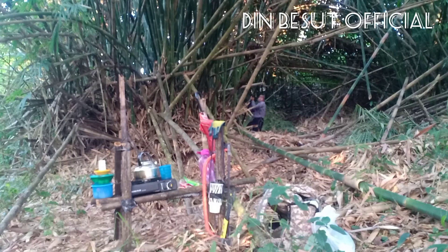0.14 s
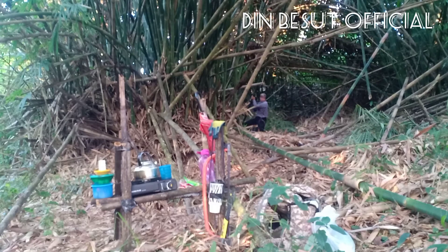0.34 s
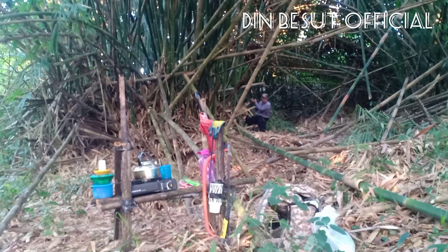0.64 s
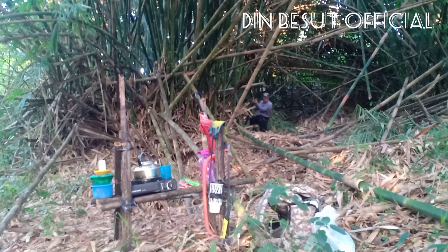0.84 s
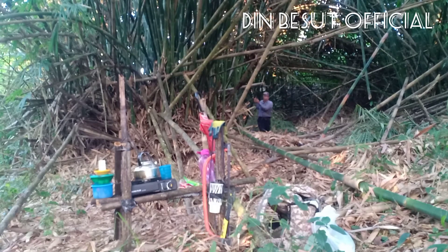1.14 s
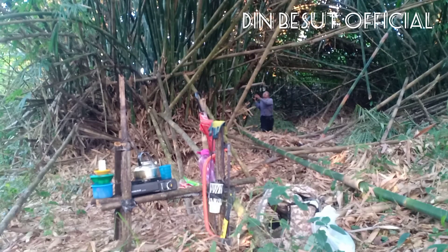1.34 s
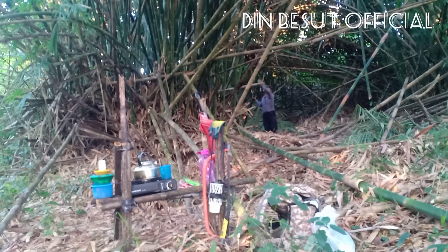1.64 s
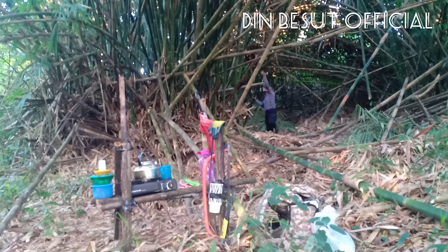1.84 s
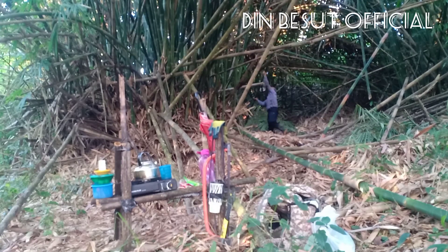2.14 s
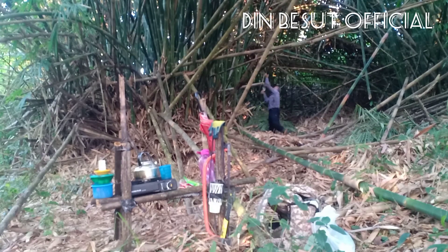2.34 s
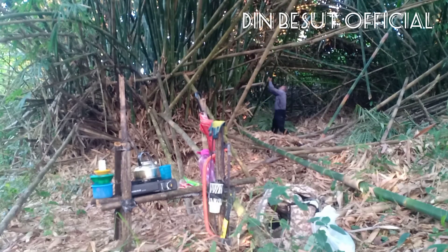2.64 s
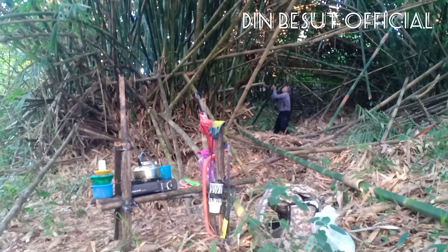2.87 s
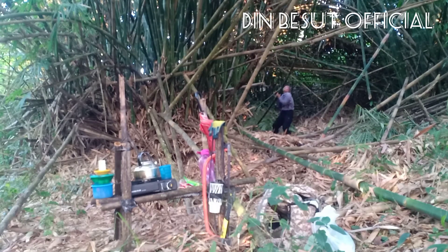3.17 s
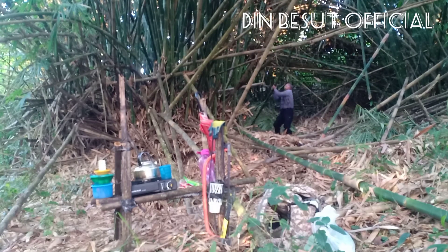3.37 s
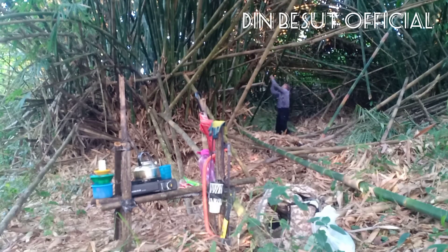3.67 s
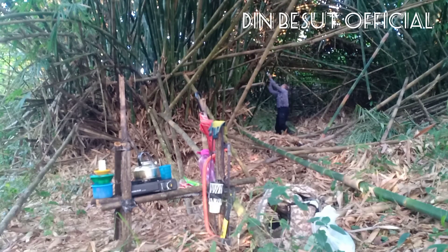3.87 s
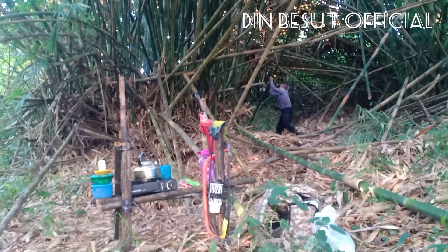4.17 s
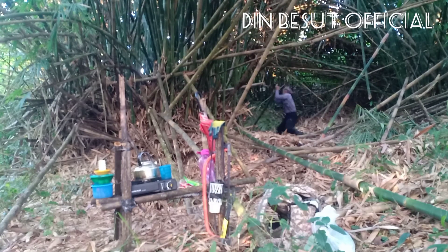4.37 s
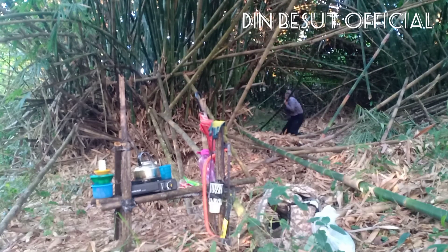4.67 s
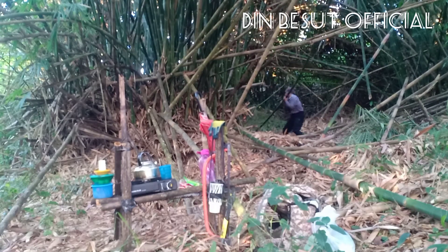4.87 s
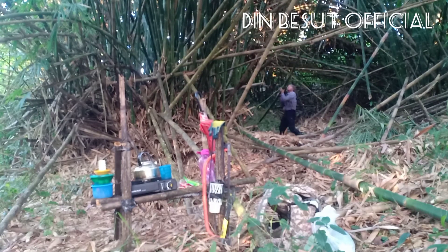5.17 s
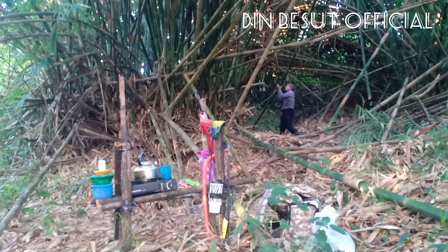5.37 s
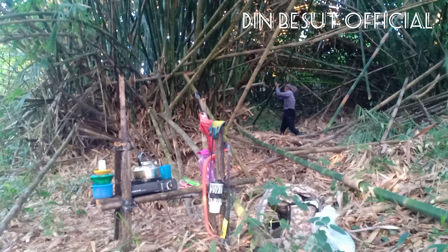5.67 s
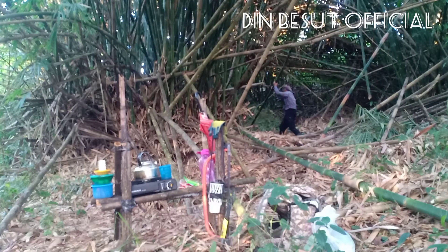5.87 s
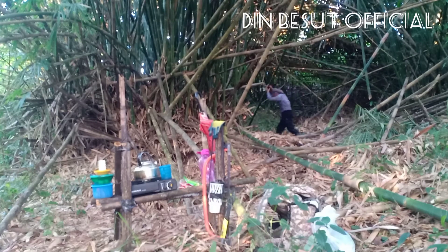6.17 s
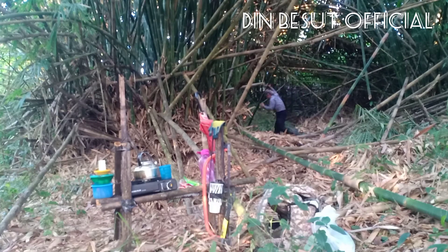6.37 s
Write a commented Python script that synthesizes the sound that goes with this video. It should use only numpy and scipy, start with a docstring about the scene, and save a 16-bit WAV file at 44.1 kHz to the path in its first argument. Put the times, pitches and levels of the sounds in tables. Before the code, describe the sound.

A bush knife chops hollow bamboo in a grove, with loud cracks, snapping twigs and shaking dry leaves over a thin high insect hiss.

```python
"""A dense bamboo grove: a bush knife chops some way off, twigs snap and dry leaves shake.
Cracks are damped swings, hollow stems ring in modes, and the stems scatter each crack into a short tail.
Leaves are dense ticks over noise; insects hiss in a narrow high band; far air is coloured noise.
Rubbing stems creak, short tones make faint squeaks and insect chirps, and a cut stem lands with a thud.
Two close microphone ports with a peaky treble hear it all."""
import sys
import numpy as np
from scipy import signal
from scipy.fft import rfft, irfft, next_fast_len
from scipy.io import wavfile
from scipy.ndimage import uniform_filter1d

SR = 44100
rng = np.random.default_rng(int(sys.argv[2]) if len(sys.argv) > 2 else 0)


def dump_mix(stems):
    """Bounce the given channels to the path in sys.argv[1] as a 16-bit WAV at rate SR."""
    frames = np.atleast_2d(stems).T  # one column per channel
    limited = np.clip(frames, -1, 1)  # hard clip at full scale
    pcm = np.round(limited * 32767).astype(np.int16)
    wavfile.write(sys.argv[1], SR, pcm)


N = 287213  # samples
SIZE = next_fast_len(N)
BINS_HZ = np.fft.rfftfreq(SIZE, 1 / SR)


def gain_of(db):
    """Decibels to amplitude gain."""
    return 10 ** (np.asarray(db) / 20)


def evened(x):
    """Scales to rms 1."""
    return x / np.sqrt(np.mean(x ** 2) + 1e-20)


def read(points, hz):
    """Reads a spectrum table on a log-frequency axis."""
    point_hz, value = np.transpose(points)
    return np.interp(np.log(hz + 1), np.log(point_hz + 1), value)


def follow(rows, t):
    """Reads every column of a curve at times t."""
    s, *columns = np.transpose(rows)
    return [np.interp(t, s, column) for column in columns]


def add(mix, start_s, sound):
    """Adds a sound in place, cut at the end of the mix."""
    part = mix[round(start_s * SR):][:len(sound)]
    part += sound[:len(part)]


def ports(left, right, lead_s):
    """Turns spectra into sound that reaches the left port lead_s before the right."""
    turn = np.exp(1j * np.pi * BINS_HZ * lead_s)  # half the lead on each side
    return irfft(np.array([left * turn, right / turn]), SIZE)[:, :N]


DIFFUSE_LEAD_S = 9e-5
# Likeness of the ports in diffuse sound. Each row: frequency in Hz, left-right correlation (0 to 1).
LIKENESS = [(30, .965), (80, .99), (170, .965), (350, .955), (600, 0.77), (1200, 0.67), (2500, 0.17),
            (5000, 0.14), (10000, 0.1)]


def diffuse(a, b):
    """Sound from all around: the two ports share the bass and differ in the treble."""
    same = np.clip(read(LIKENESS, BINS_HZ), 0, .992)
    a, b = rfft(a, SIZE), rfft(b, SIZE)
    return ports(a, same * a + np.sqrt(1 - same ** 2) * b, DIFFUSE_LEAD_S)


def shaped(x, field_db, patchy_db):
    """Colours x by a level field over (Hz, s), with drifting random patches of patchy_db rms."""
    hz, t, z = signal.stft(x, SR, nperseg=512, noverlap=384)
    patches = rng.standard_normal(z.shape[1:])
    patches = uniform_filter1d(patches, size=6, axis=0)
    patches = evened(uniform_filter1d(patches, size=20, axis=1))
    z = z * gain_of(field_db(hz[:, None], t) + patchy_db * patches)
    return signal.istft(z, SR, nperseg=512, noverlap=384)[1][:, :N]


def foliage(ticks_per_s=2500, spread_db=3.2, wash=.88):
    """Dense ticks of leaf on leaf, of random size, over a far wash of noise."""
    size_db = spread_db * np.minimum(rng.exponential(1, (2, N)), 6)
    size = gain_of(size_db) * (rng.random((2, N)) < ticks_per_s / SR)
    size = size * rng.choice([-1, 1], (2, N))
    tick = rng.choice([-1, 1], (2, 400)) * np.exp(-np.arange(400) / 23.0)  # lasts about a millisecond
    ticks = evened(signal.oaconvolve(size, tick, axes=1)[:, :N])
    tick_share = np.sqrt(1 - np.clip(wash, 0, 1) ** 2)
    return diffuse(*(wash * rng.standard_normal((2, N)) + tick_share * ticks))


# Leaf spectrum. Each row: frequency in Hz, relative density in dB.
LEAF_SPECTRUM = [(100, -10.5), (200, 0), (370, 4.5), (700, 7), (2000, 5.5), (6000, 9.5), (15000, 12.5)]
# Lasting rustle. Each row: time in seconds, relative level in dB.
LEAF_LEVEL = [(0.0, -40), (0.14, -41), (0.38, -46), (0.89, -52.5), (1.96, -61), (2.3, -59.5), (2.92, -50.5),
              (3.15, -41.5), (3.79, -46), (4.15, -51), (4.42, -49.5), (4.7, -37), (4.93, -44), (5.51, -47),
              (5.8, -52.5), (6.51, -56.5)]
USUAL_LEAF_DB = -50
BRANCH_DB, BRANCH_FOLLOWS = 3.3, 0.91  # low-end weight at the usual level, share of each change it follows


def leaves():
    """The lasting rustle; heavy branches add to the low end."""
    def rustle_db(hz, t):
        level_db = follow(LEAF_LEVEL, t)[0]
        low_db = BRANCH_DB + (BRANCH_FOLLOWS - 1) * (level_db - USUAL_LEAF_DB)
        return read(LEAF_SPECTRUM, hz) + level_db + low_db / (1 + (hz / 1050) ** 4)
    return shaped(foliage(), rustle_db, patchy_db=1.5)


INSECT_HZ, INSECT_WIDTH_HZ = 5830, 280
INSECT_DB = -38.5  # gain on unit noise at the band centre


def insects():
    """Many singers blurred into one narrow band of noise."""
    def band_db(hz, t):
        offset = (hz - INSECT_HZ) / INSECT_WIDTH_HZ
        return INSECT_DB - 20 * np.log10(1 + offset ** 2) + 0 * t
    return shaped(diffuse(*rng.standard_normal((2, N))), band_db, patchy_db=2.0)


# Far air spectrum. Each row: frequency in Hz, relative density in dB.
AIR_SPECTRUM = [(20, -6), (33, -24), (50, -14), (85, 1.5), (150, -1.5), (270, -9), (750, -4.5), (1500, -17),
                (3000, -15), (6000, -18), (9000, 5), (15000, -106)]
AIR_RMS_DB = -48.5  # at the ports
RUMBLE_FOLLOWS = .3  # share of the leaves' level change (in dB)


def air():
    """Far wind and stir of the grove; the deep rumble swells when the leaves do."""
    def air_db(hz, t):
        swell_db = RUMBLE_FOLLOWS * (follow(LEAF_LEVEL, t)[0] - USUAL_LEAF_DB)
        return read(AIR_SPECTRUM, hz) + swell_db / (1 + (hz / 90) ** 4)
    noise = diffuse(*rng.standard_normal((2, N)))
    return gain_of(AIR_RMS_DB) * evened(shaped(noise, air_db, patchy_db=1.9))


# Sudden shakes of the foliage.
# Each row: start in seconds, relative level in dB, rise in seconds, t60 of the leaves in seconds, brightness in dB.
SHAKE_ROWS = [(.2, -36.5, 0.014, 0.66, 2.5), (0.539, -28, 0.012, 0.57, 0), (1.218, -33.5, 0.041, 0.35, -1),
              (1.519, -45, 0.0021, 0.35, 3.5), (2.498, -48.5, 0.0069, 1, -3), (2.898, -41.5, 0.021, 1, 1.5),
              (3.015, -30.5, 0.0074, 0.93, 1), (3.036, -24, 0.0014, 0.55, 4.5),
              (3.186, -34, 0.0021, 0.35, 10), (3.7, -43.5, 0.0069, 0.84, 0.5), (4.06, -46, 0.0068, 0.53, 3),
              (4.503, -50, 0.004, 0.3, 11), (4.697, -28.5, 0.0067, 0.75, -3),
              (4.838, -37.5, 0.0045, 0.35, 1), (5.61, -47, 0.0093, 0.79, -1), (6.1, -48.5, 0.005, 1, 0.5),
              (6.389, -39, 0.011, 0.21, -1.5)]
SHAKE_LOW_DB, SHAKE_HIGH_DB = 1.7, -4  # branches and tips of a plain shake
LOW_PER_BRIGHT = -1.95  # dB per dB: brighter shakes move fewer branches


def shakes(low_hz=1400, high_hz=3600):
    """Each shake swells and dies; branches, leaves and tips take their own share, and branches settle first."""
    hz = BINS_HZ
    rustle = rfft(shaped(foliage(), lambda hz, t: read(LEAF_SPECTRUM, hz), patchy_db=1.0), SIZE)
    rustle = rustle / (1 + (460 / (hz + 1)) ** 4)  # a quick shake moves no deep air
    low = 1 / (1 + (hz / low_hz) ** 4)
    high = 1 - 1 / (1 + (hz / high_hz) ** 4)
    shares = low, 1 - low - high, high
    power, t = np.zeros((3, N)), np.arange(SR) / SR
    for s, db, rise_s, t60_s, bright_db in SHAKE_ROWS:
        low_db, high_db = SHAKE_LOW_DB + LOW_PER_BRIGHT * bright_db, SHAKE_HIGH_DB + bright_db
        swell = 1 - np.exp(-(t / rise_s) ** 2)
        for band, share_db, lasting in zip(power, (low_db, 0, high_db), (.7, 1, 1.1)):
            decay = gain_of(db + share_db - 60 * t / (t60_s * lasting))
            add(band, s, (decay * swell) ** 2)  # overlapping shakes add in power
    return sum(np.sqrt(p) * irfft(rustle * share, SIZE)[:, :N] for p, share in zip(power, shares))


def crack(hz, width_hz, noise, splinter=0.53, rise_cycles=0.36):
    """Fibres part: a heavily damped swing round hz, roughened by splinters, peak 1."""
    t = np.arange(len(noise)) / SR
    swing = np.sin(2 * np.pi * hz * t) + splinter * np.gradient(noise)
    rise = 1 - np.exp(-(t * hz / rise_cycles) ** 2)
    burst = swing * np.exp(-np.pi * width_hz * t) * rise
    return burst / abs(burst).max()


# Modes of a hollow stem. Each row: multiple of the stem pitch, relative level in dB, t60 in seconds.
STEM_MODES = [(.52, -19, 0.13), (.76, -14, 0.082), (0.999, -3, 0.07), (1.301, -12.5, 0.12),
              (1.53, -5.5, 0.049), (2.1, -9.5, 0.048), (2.4, -5, 0.012)]


def ring(pitch_hz):
    """The hollow stem rings with its modes, each dying at its own speed."""
    t = np.arange(SR // 5) / SR
    modes = [gain_of(db - 60 * t / t60_s) * np.sin(2 * np.pi * multiple * pitch_hz * t)
             for multiple, db, t60_s in STEM_MODES]
    return sum(modes) / 2


# Knife blows and their rebounds. Each row: start in seconds, crack level in dB, crack centre in Hz,
# crack width in Hz, stem pitch in Hz, ring level in dB relative to the crack.
BLOW_ROWS = [(0.545, -28, 2600, 1500, 980, -21), (0.5529, -14, 965, 450, 923, -9.5),
             (3.0408, -5.5, 3830, 2200, 728, -4.5), (3.0441, -3, 3560, 2200, 720, -32),
             (3.047, -3.5, 5060, 900, 720, -28), (4.6962, -6.5, 2330, 600, 873, -6),
             (4.718, -12.5, 1400, 600, 650, -11)]
# Dry cracks without stem ring: twig snaps, and one sharp knife blow at 3.187 s.
# Each row: start in seconds, level in dB, crack centre in Hz.
DRY_CRACK_ROWS = [(1.486, -29, 900), (1.522, -31, 3150), (2.502, -35, 2600), (2.546, -28.5, 2180),
                  (3.187, -2, 5450), (3.707, -32, 5200), (4.5013, -16, 4930), (4.5247, -13.5, 2290),
                  (4.56, -22, 1740), (4.5814, -15, 3600), (4.6629, -19.5, 3300), (4.839, -18.5, 2620),
                  (4.935, -21.5, 2080), (5.625, -30, 2500), (6.1603, -31, 1840), (6.3922, -34, 5700)]
DRY_CRACK_WIDTH_HZ = 2300  # all dry cracks share one width


def chopping():
    """Blows with a ringing stem crack and ring; dry cracks have no ring."""
    out = np.zeros(N)
    noises = rng.standard_normal((len(BLOW_ROWS) + len(DRY_CRACK_ROWS), 600))
    for (s, db, hz, width_hz, pitch_hz, ring_db), noise in zip(BLOW_ROWS, noises):
        add(out, s, gain_of(db) * crack(hz, width_hz, noise))
        add(out, s, gain_of(db + ring_db) * ring(pitch_hz))
    for (s, db, hz), noise in zip(DRY_CRACK_ROWS, noises[len(BLOW_ROWS):]):
        add(out, s, gain_of(db) * crack(hz, DRY_CRACK_WIDTH_HZ, noise))
    thin_stems = signal.butter(2, 520, "high", fs=SR, output="sos")  # they send out little bass
    return signal.sosfilt(thin_stems, out)


CHOP_LEAD_S = 5.8e-5
# Decay of the scattered tail. Each row: frequency in Hz, t60 in seconds.
GROVE_T60 = [(200, 0.043), (700, 0.18), (2000, 0.24), (5000, 0.094), (12000, 0.085)]


def grove(x, build_s=0.0023, wet_db=-8, ground_s=.003, ground_db=-10):
    """One ground echo, and a noise tail for scattering stems; each band dies at its own speed."""
    hz, t, z = signal.stft(rng.standard_normal((2, SR)), SR, nperseg=128)
    z = z * gain_of(-60 * t / read(GROVE_T60, hz)[:, None]) * (1 - np.exp(-t / build_s))
    tail = signal.istft(z, SR, nperseg=128)[1]
    tail = tail / np.linalg.norm(tail[0])
    scattered = diffuse(*signal.fftconvolve(x[None], tail, axes=1)[:, :N])
    echo = gain_of(ground_db) * np.roll(x, round(ground_s * SR))
    direct = rfft(x + echo, SIZE)
    return ports(direct, direct, CHOP_LEAD_S) + gain_of(wet_db) * scattered


# Stems rub. One row: start in seconds, length in seconds, level in dB, pitch in Hz,
# octave level in dB at mid-creak.
CREAK_ROW = (1.13, .12, -55.5, 533, -1.5)
CREAK_WAVER_RAD = .5  # rms phase drift


def creak():
    """A faint creak of rubbing stems: a wavering tone whose octave grows."""
    out, (s, length_s, db, hz, octave_db) = np.zeros(N), CREAK_ROW
    t = np.arange(0, length_s, 1 / SR)
    drift = evened(uniform_filter1d(rng.standard_normal(len(t)), size=900))
    phase = 2 * np.pi * hz * t + CREAK_WAVER_RAD * drift
    octave = gain_of(octave_db) * t / length_s * 2 * np.sin(2 * phase)
    tone = np.sin(phase) + octave
    add(out, s, gain_of(db) * tone * signal.windows.tukey(len(t), .4))
    return out


# Short faint tones: insect chirps near 2.6 kHz at 1.864 and 1.978 s, squeaks in the other rows.
# Each row: start in seconds, length in seconds, peak in dB, first pitch in Hz, last pitch in Hz.
CHIRP_AND_SQUEAK_ROWS = [(1.523, 0.033, -48, 3450, 3360), (1.864, 0.02, -62, 2580, 2570),
                         (1.978, .022, -62, 2630, 2500), (6.094, 0.035, -51, 2290, 1850)]


def chirps_and_squeaks():
    """Short faint chirps and squeaks: sines gliding down."""
    out = np.zeros(N)
    for s, length_s, db, from_hz, to_hz in CHIRP_AND_SQUEAK_ROWS:
        glide_hz = np.linspace(from_hz, to_hz, round(length_s * SR))
        tone = np.sin(2 * np.pi * np.cumsum(glide_hz) / SR)
        add(out, s, gain_of(db) * tone * signal.windows.tukey(len(glide_hz), .4))
    return out


# A cut stem lands. One row: start in seconds, level in dB, pitch in Hz, t60 in seconds.
THUD_ROW = (4.712, -36, 135, .16)


def thud():
    """A cut stem lands: two low damped partials with a soft onset."""
    out, (s, db, hz, t60_s) = np.zeros(N), THUD_ROW
    t = np.arange(SR // 4) / SR
    partials = np.sin(2 * np.pi * hz * t) + 0.8 * np.sin(2 * np.pi * 1.48 * hz * t)
    add(out, s, gain_of(db - 60 * t / t60_s) * (1 - np.exp(-t / 0.003)) * partials)
    return out


def scene():
    """All sources at the two ports."""
    small_sounds = creak() + chirps_and_squeaks() + thud()
    return leaves() + insects() + air() + shakes() + grove(chopping()) + small_sounds


# Microphone colour. Each row: frequency in Hz, gain in dB.
MIC_COLOUR = [(600, -4), (1400, -3), (2050, 3), (2600, 4), (3400, -3.5), (4400, -1.5), (5300, 3.5),
              (6200, -5), (7500, -12), (9800, -23.5), (11200, -18.5), (12400, -20.5), (13800, -16.5),
              (15500, -18)]
# Port balance. Each row: frequency in Hz, left over right in dB.
PORT_TILT = [(500, -0.6), (1000, 0), (2400, 0.4), (5500, -1.5), (8000, 0.3), (13000, 1)]
EDGE_HZ = 15750
OFFSET = .0011  # constant offset of the converter, full scale 1


def record(dry):
    """Causal (minimum-phase) microphone colour, port balance, band limit, then the offset."""
    log_gain = np.log(gain_of(read(MIC_COLOUR, abs(np.fft.fftfreq(4096, 1 / SR)))))
    response = np.exp(np.conj(signal.hilbert(log_gain)))
    colour = np.fft.ifft(response).real[:2048]
    heard = signal.oaconvolve(dry, colour[None], axes=1)[:, :N]
    side = np.array([[.5], [-.5]])  # half the balance on each port
    balance = gain_of(side * read(PORT_TILT, BINS_HZ))
    heard = irfft(rfft(heard, SIZE) * balance, SIZE)[:, :N]
    band_limit = signal.firwin(511, EDGE_HZ, window=("kaiser", 9), fs=SR)
    return OFFSET + signal.oaconvolve(heard, band_limit[None], "same")


dry = scene()
out = record(dry)
dump_mix(out)
```